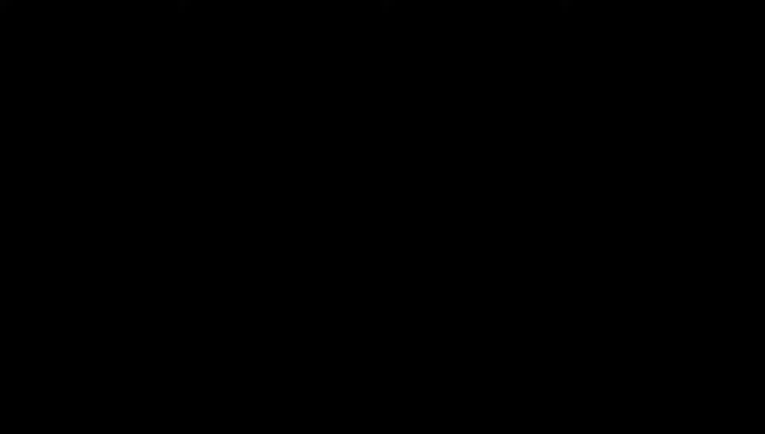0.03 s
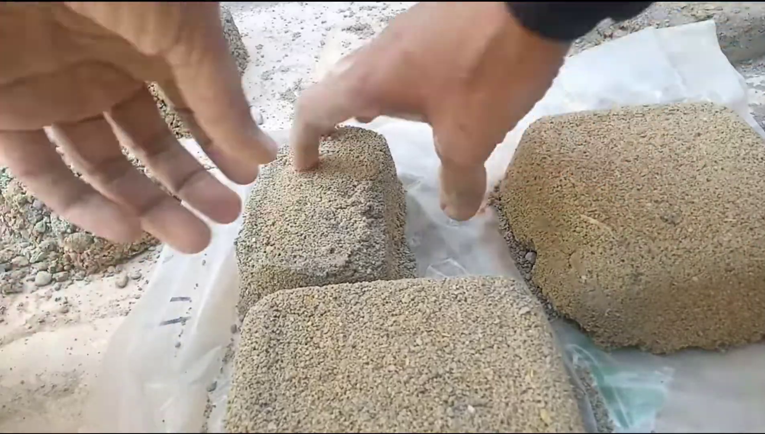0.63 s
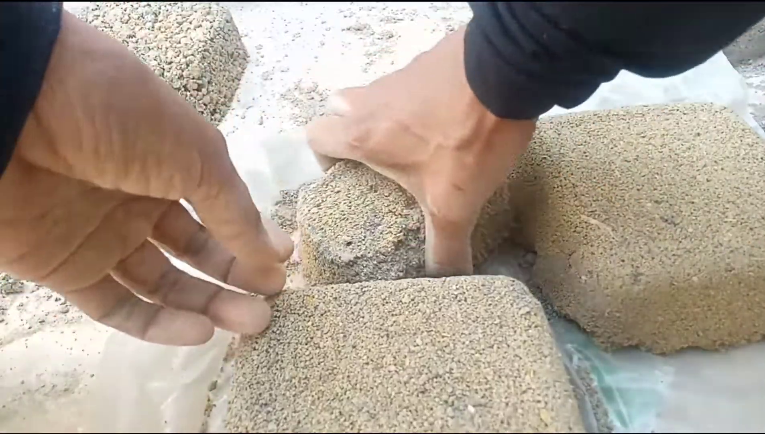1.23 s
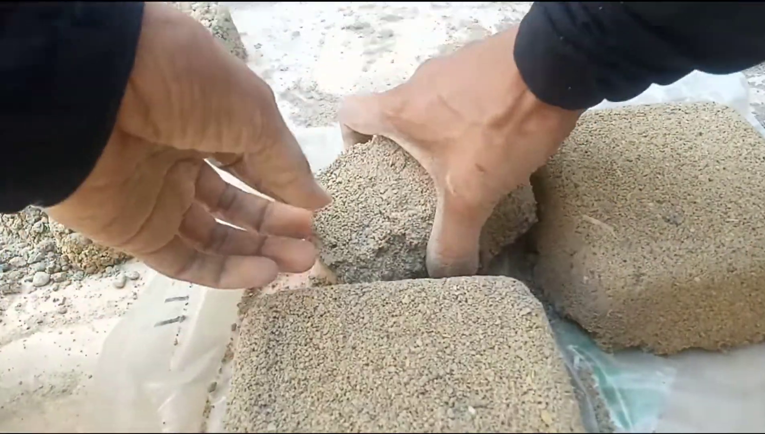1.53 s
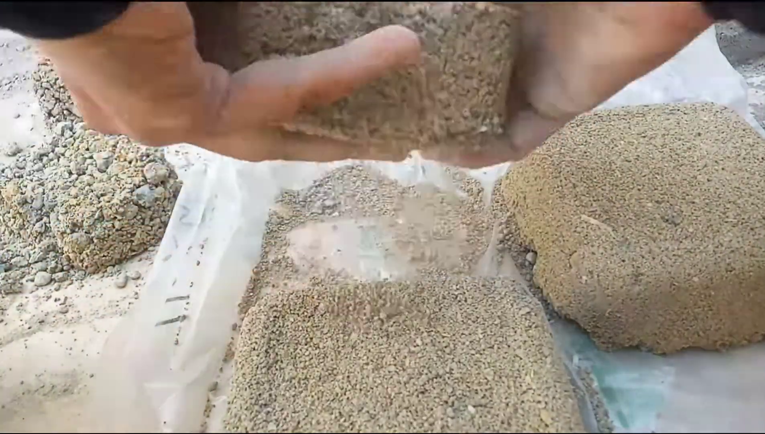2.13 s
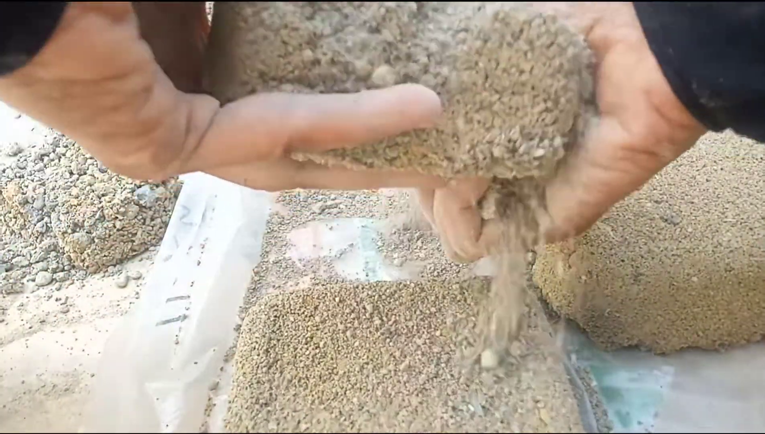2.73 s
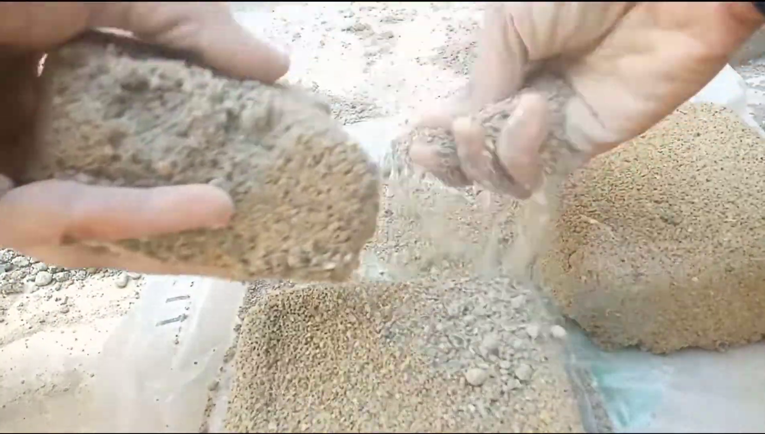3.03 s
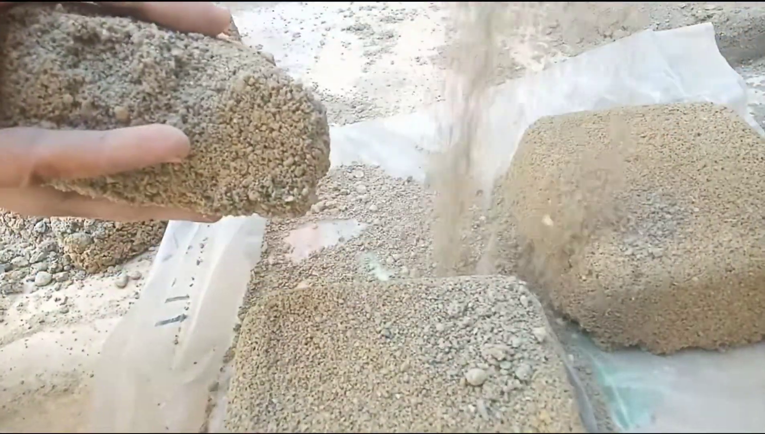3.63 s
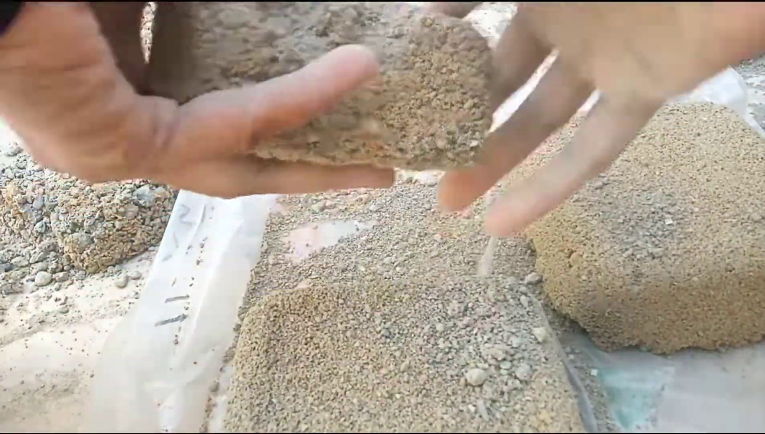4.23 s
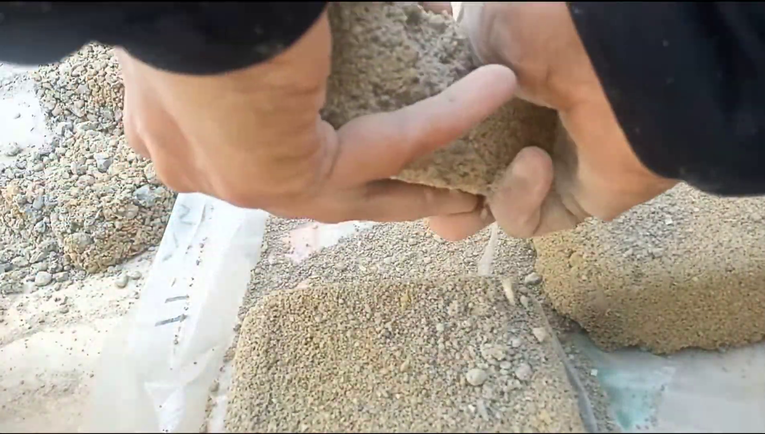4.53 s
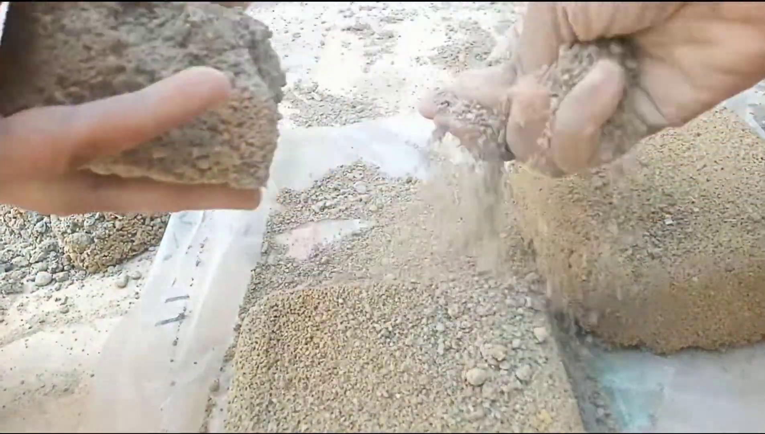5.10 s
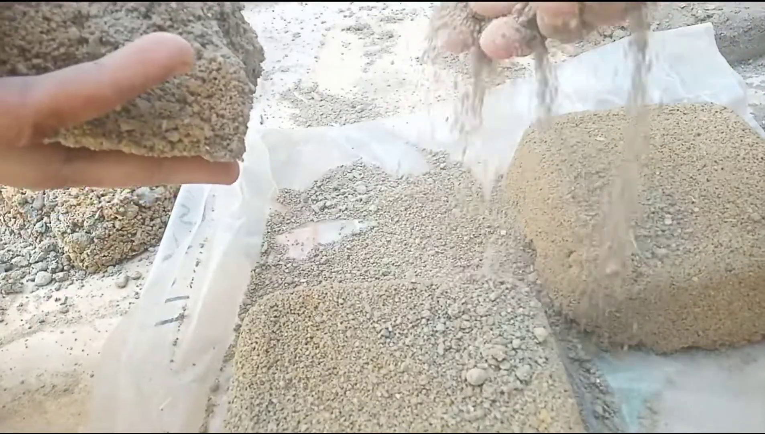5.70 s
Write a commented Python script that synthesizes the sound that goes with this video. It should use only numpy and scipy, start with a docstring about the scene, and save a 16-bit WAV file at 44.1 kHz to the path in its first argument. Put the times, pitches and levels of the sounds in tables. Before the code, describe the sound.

Two hands grip and grind a sandy concrete block close to the microphone, making dry, gritty crunches with sharp clicks of snapping crumbs. Loose grit then rains onto other blocks and a plastic sheet. A second round of crunching, with soft dull thuds, leads to another hissing pour. Behind it are a low machine hum, outdoor rumble and faint birds.

```python
"""Sandy concrete, broken and ground to grit by two hands close by.
Thousands of grains snap loose and rain onto other blocks and a plastic sheet, each a tick, a brief
ring and a spray of splinters. Larger crumbs click, tiny chips tick, the gripped block thuds.
Behind: low machine hum, outdoor rumble, faint birds."""
import sys
import numpy as np
from scipy import signal
from scipy.fft import rfft, irfft
from scipy.io import wavfile
from scipy.ndimage import uniform_filter1d

SR = 44100
rng = np.random.default_rng(int(sys.argv[2]) if len(sys.argv) > 2 else 0)


def unload_audio(sound):
    """Save the sound as a 16-bit wav file, at the path given as the first command line argument."""
    columns = np.transpose(np.atleast_2d(sound))
    # keep every value between -1 and 1, then stretch to whole-number steps
    steps = np.round(np.clip(columns, -1, 1) * 32767)
    wavfile.write(sys.argv[1], SR, steps.astype(np.int16))


N = 262836
START_S = 0.14


def undb(db):
    """Decibels to gain."""
    return 10 ** (np.asarray(db) / 20)


def unit(x):
    """Scale to rms 1."""
    return x / np.sqrt(np.mean(x ** 2) + 1e-18)


def colour(x, spectrum, size=8192):
    """Minimum-phase filter through (frequency [Hz], gain [dB]) points; 20 dB/octave skirts."""
    hz, db = np.transpose(spectrum)
    f = np.maximum(np.fft.rfftfreq(size, 1 / SR), 1)
    octaves_outside = np.maximum(np.log2(hz[0] / f), 0) + np.maximum(np.log2(f / hz[-1]), 0)
    gain_db = np.interp(np.log(f), np.log(hz), db) - 20 * octaves_outside
    cepstrum = irfft(np.log(undb(gain_db)))
    cepstrum[1:size // 2] *= 2
    cepstrum[size // 2 + 1:] = 0
    response = irfft(np.exp(rfft(cepstrum)))
    return signal.fftconvolve(x, response)[:len(x)]


def ring(x, hz, q):
    """One resonance, gain 1 at its centre."""
    return signal.lfilter(*signal.iirpeak(min(hz, SR / 3), max(q, 1), SR), x)


def walk(rate_hz):
    """Smooth random drift, rms 1."""
    step = max(int(SR / rate_hz), 1)
    held = np.repeat(rng.standard_normal(N // step + 1), step)
    return unit(uniform_filter1d(uniform_filter1d(held, step), step)[:N])


def add(out, at_s, sound):
    """Mix a sound in at a time."""
    i = int(at_s * SR)
    out[i:i + len(sound)] += sound[:N - i]


def background(hum_hz=100.0, hum_db=-39, chirr_db=-51, chirr_rise_db_per_s=1, fade_s=0.2):
    """Wavering machine hum with its octave, outdoor rumble, slowly growing chirr of far birds."""
    # spectra: (frequency [Hz], gain [dB])
    rumble_spectrum = [(22, -54), (38, -18), (52, -8.5), (80, 0.5), (130, -2), (190, -5), (280, -6),
                       (450, -15), (800, -20), (1500, -25), (3500, -29), (5500, -47), (7000, -46.5),
                       (10000, -65.5), (15000, -63)]
    chirr_spectrum = [(2500, -30), (3150, 7), (3450, 9), (3800, 9.5), (4400, 0), (5200, -41)]
    # rumble envelope: (time [s], level [dB])
    rumble_levels = [(0.3, -40), (0.8, -36.5), (1.8, -38), (2.8, -36.5), (4.1, -36), (5.2, -35),
                     (5.95, -37.5)]
    t = np.arange(N) / SR
    phase = 2 * np.pi * np.cumsum(hum_hz + 1.515 * walk(9)) / SR
    hum = unit(np.sin(phase) + undb(-15.5) * np.sin(2 * phase)) * undb(hum_db + 2.14 * walk(12))
    rumble = unit(colour(rng.standard_normal(N), rumble_spectrum))
    rumble *= undb(np.interp(t, *np.transpose(rumble_levels)) + 1.44 * walk(25))
    chirr = unit(colour(rng.standard_normal(N), chirr_spectrum))
    chirr *= undb(chirr_db + chirr_rise_db_per_s * t + 0.92 * walk(68))
    fade_in = np.clip((t - START_S) / fade_s, 0, 1)
    return (hum + rumble + chirr) * undb(-13 * (1 - fade_in))


def bird(start_hz=3750, floor_hz=3270, glide_s=0.022, length_s=0.07):
    """Short far whistles that drop in pitch and flutter in the air."""
    # chirps: (time [s], level [dB])
    calls = [(0.165, -58), (0.275, -54), (0.464, -48), (0.672, -53)]
    out, t = np.zeros(N), np.arange(int(length_s * SR)) / SR
    hz = floor_hz + (start_hz - floor_hz) * np.exp(-t / glide_s)
    chirp = np.sqrt(2) * np.sin(2 * np.pi * np.cumsum(hz) / SR) * np.sin(np.pi * t / length_s)
    for at_s, db in calls:
        add(out, at_s, chirp * undb(db))
    return out * undb(2.5 * walk(300))


def thuds(rise_s=0.0061, rub_hz=145, rub_decay_s=0.022):
    """The block gives way between the palms: two or three low swings and a dull rub of skin."""
    # jolts of the block: (time [s], level [dB], pitch [Hz])
    jolts = [(1.985, -24, 93), (3.478, -20, 112), (3.938, -17, 104), (4.008, -16.5, 109),
             (4.23, -20.5, 122), (4.281, -16.5, 103), (4.403, -14.5, 94.5), (4.485, -16, 96),
             (4.547, -22.5, 100), (4.643, -22, 100), (4.742, -16, 104), (4.817, -21, 86),
             (4.941, -17.5, 92), (5.058, -12, 100), (5.295, -20, 94), (5.403, -18.5, 126)]
    out, t = np.zeros(N), np.arange(SR // 8) / SR
    swell = (t / rise_s) ** 2 * np.exp(2 - 2 * t / rise_s)
    slip = (1 - np.exp(-t / rise_s)) * np.exp(-t / rub_decay_s)
    for at_s, db, hz in jolts:
        rub = unit(ring(ring(rng.standard_normal(len(t)), rub_hz, q=1.7), rub_hz, q=1.7))
        swing = swell * np.sin(2 * np.pi * hz * t)
        add(out, at_s, undb(db) * (undb(-10) * slip * rub - swing))
    return out


def chips(hz=9500, decay_s=0.00073):
    """Hard chips, so small that they only tick, very high."""
    # chips flicking close by: (time [s], peak [dB])
    flicks = [(0.913, -48), (0.925, -49), (1.0659, -42), (1.3853, -39), (2.949, -47), (4.592, -50),
              (5.4234, -39)]
    out, t = np.zeros(N), np.arange(SR // 100) / SR
    for at_s, db in flicks:
        tick = ring(rng.standard_normal(len(t)) * np.exp(-t / decay_s), hz, q=1.1)
        add(out, at_s, tick * undb(db) / np.abs(tick).max())
    return out


def crumbs(spray_db=-18, spray_t60_s=0.013, ring_db=8, trim_db=-1.0):
    """A large crumb gives one sharp click, a short ring and a spray of splinters."""
    # crumbs snapping off or landing: (time [s], level [dB], ring [Hz])
    snaps = [(0.79, -22, 2100), (0.913, -15, 2320), (0.922, -20, 2620), (1.2, -14, 2390),
             (1.293, -14, 1820), (1.341, -15.5, 2210), (1.899, -20, 2580), (2.073, -18.5, 2310),
             (2.104, -15, 2710), (2.306, -12, 2340), (2.36, -13, 2870), (2.441, -16, 2640),
             (2.516, -12.5, 2870), (2.601, -17, 2420), (2.959, -11.5, 2680), (4.006, -12, 2200),
             (4.233, -18, 1803), (4.253, -9.5, 2320), (4.438, -18.5, 2660), (4.504, -18, 1800),
             (4.515, -23, 2290), (4.558, -22.5, 1800), (4.655, -20, 2300), (4.668, -20, 2260),
             (4.7, -14.5, 2650), (4.77, -14, 3200), (4.802, -16, 2330), (4.935, -9.5, 2280),
             (5.775, -15, 2610), (5.801, -13, 2850), (5.851, -15, 2510), (5.86, -18.5, 2710)]
    # click spectrum: (frequency [Hz], gain [dB])
    spectrum = [(200, -23), (600, -1), (850, -5.5), (1100, 5), (2500, 0), (3600, -0.5), (4500, -11),
                (5500, -29.5), (7000, -16.5), (9500, -47), (15000, -35)]
    out, t = np.zeros(N), np.arange(SR // 25) / SR
    for at_s, db, hz in snaps:
        spray = undb(spray_db - 60 * t / spray_t60_s) * rng.standard_normal(len(t))
        force = (t == 0) + spray
        click = colour(force + undb(ring_db) * ring(force, hz, q=5), spectrum)
        add(out, at_s, click * undb(db + trim_db) / np.abs(click).max())
    return out


def strokes(table, attack_s, release_s):
    """Each hand stroke sets in, swells or sags, and dies away; one row of gain per stroke."""
    t, gains = np.arange(N) / SR, []
    for at_s, length_s, db, swell_db, *_ in table:
        held = undb(db + swell_db * np.clip((t - at_s) / length_s, 0, 1))
        attack = np.clip((t - at_s) / attack_s, 0, 1)
        release = np.exp(-np.maximum(t - at_s - length_s, 0) / release_s)
        gains.append(held * attack * release)
    return np.array(gains)


def grit_flow():
    """Summed level of all strokes and their power-weighted ring, knock and dust, all in dB."""
    # hands grip, drag and grind the block:
    # (time [s], length [s], level [dB], swell [dB], bright ring [dB], hollow knock [dB], dust hiss [dB])
    grinds = [(0.778, 0.32, -32.5, -6.5, 0, -23, -22.5), (1.049, 0.2, -32.5, 4.5, 4, -26, -23),
              (1.26, 0.037, -29, 1, -1, -13, -23), (1.329, 0.085, -32.5, -1, -1.5, -16, -23.5),
              (1.428, 0.72, -40.5, -2, -1.5, -16, -24.5), (2.105, 0.074, -26, 1.5, 2, -11, -22.5),
              (2.186, 0.19, -27, -3.5, 4, -20, -25), (2.398, 0.37, -31.5, -1, 2, -17, -25),
              (2.803, 0.22, -31.5, -1, 0.5, -18.5, -22.5), (4.228, 0.064, -32, 0.5, -4, -13, -24),
              (4.317, 0.024, -25.5, 2, -1, -16, -31.5), (4.407, 0.21, -44, 0.5, 0.5, -23, -28),
              (4.65, 0.19, -36, -2.5, -1.5, -28, -23), (4.841, 0.21, -32.5, 3.5, -3, -14.5, -23.5)]
    # the fist opens and grit rains down: same columns
    pours = [(3.009, 0.14, -26, -0.3, 1.5, -17.5, -24), (3.149, 0.092, -23.5, 0.72, -0.5, -19.5, -23.5),
             (3.301, 0.14, -29, -1, -1, -16.5, -25), (3.449, 0.17, -23, -0.39, 1.5, -16, -25),
             (3.653, 0.24, -22, 0.78, 3.5, -17, -27), (3.93, 0.086, -20, -0.48, 4.5, -12.5, -26),
             (4.05, 0.073, -24, -2, 0.5, -25, -28.5), (5.04, 0.071, -24.5, -0.9, -3, -13.5, -24),
             (5.171, 0.2, -26, 1, 0, -15.5, -23.5), (5.429, 0.7, -27.5, -1.7, -1.5, -13, -25)]
    grinding = strokes(grinds, attack_s=0.01, release_s=0.039)
    pouring = strokes(pours, attack_s=0.031, release_s=0.085)
    power = np.vstack([grinding, pouring]) ** 2 + 1e-14
    total = power.sum(axis=0)
    timbre_db = np.array(grinds + pours)[:, 4:]
    ring_db, knock_db, dust_db = timbre_db.T @ power / total
    return 10 * np.log10(total), ring_db, knock_db, dust_db


def impacts(rate_per_s, spread_db, cap_db):
    """Random grain contacts, mostly tiny, a few large; mean power independent of rate."""
    size = undb(np.minimum(spread_db * rng.exponential(size=N), cap_db))
    hits = rng.random(N) < rate_per_s / SR
    return unit(hits * size * rng.choice([-1, 1], N) / np.sqrt(rate_per_s))


def skitter(contacts, t60_s, spray_db):
    """Contacts, each followed by a fading spray of bouncing splinters."""
    pole = undb(-120 / (t60_s * SR))
    power = signal.lfilter([1 - pole], [1, -pole], contacts ** 2)
    return contacts + undb(spray_db) * np.sqrt(power) * rng.standard_normal(N)


def grain_rings(contacts, q, pitch_count=24):
    """Each contact rings briefly at the pitch of its own grain."""
    kind = rng.integers(0, pitch_count, N)
    clicks = contacts * rng.choice([-1, 1], N)
    pitches_hz = np.geomspace(900, 5500, pitch_count)
    return unit(sum(ring(clicks * (kind == k), hz, q) for k, hz in enumerate(pitches_hz)))


def grit(ref_grains_per_s=3600, ref_flow_db=-29, rate_exponent=0.85):
    """Grains break loose in small avalanches; the same contacts tick, hiss and knock on the blocks."""
    # spectra of grain ticks, block knock and fine sand: (frequency [Hz], gain [dB])
    grain_spectrum = [(700, -22), (860, -17), (960, -5), (1430, -1.5), (1570, -7), (1780, -0.5), (1980, -6),
                      (2300, -1.5), (2750, -0.5), (3020, -4.5), (3200, -2.5), (3580, -2), (3900, -11.5),
                      (4400, -12.5), (5000, -23), (5600, -33)]
    knock_spectrum = [(200, -13.5), (350, -16), (470, -8.5), (620, -4), (730, -8), (820, -18.5),
                      (1100, -23.5)]
    sand_spectrum = [(4500, -40), (5600, -1.5), (6700, 1.5), (7400, -0.5), (8500, -11.5), (10000, -17.5),
                     (12300, -18.5), (13600, -14.5), (15500, -18)]
    flow_db, ring_db, knock_db, dust_db = grit_flow()
    rate_per_s = np.maximum(ref_grains_per_s * undb(rate_exponent * (flow_db - ref_flow_db)), 900)
    # a thin trickle spurts, a thick pour runs evenly
    spurt_db = np.minimum(np.sqrt(2500 / rate_per_s), 2)
    avalanche = undb(spurt_db * walk(90) + 0.71 * walk(25))
    contacts = impacts(rate_per_s, spread_db=2.0, cap_db=12.5) * avalanche
    clicks = skitter(contacts, t60_s=0.043, spray_db=-8.5)
    grains = unit(colour(clicks + undb(-4.5) * grain_rings(contacts, q=8.6), grain_spectrum))
    # each stroke's ring setting lends the grains a brighter ring around 2.85 kHz
    grains += (undb(ring_db) - 1) * ring(grains, hz=2850, q=3.1)
    grains = unit(grains * undb(-0.6 * ring_db))
    knock = unit(colour(clicks, knock_spectrum)) * undb(knock_db)
    fine_clicks = skitter(contacts, t60_s=0.011, spray_db=2.0)
    sand = unit(colour(fine_clicks, sand_spectrum)) * undb(dust_db)
    return (grains + knock + sand) * undb(flow_db + 0.13)


def scene():
    """Crumbling in front, yard behind; mono."""
    return (grit() + crumbs() + chips() + thuds() + bird() + background())[None]


def record(dry, cutoff_hz=15650, ramp_s=0.005):
    """Silence until START_S, a short ramp in, then a steep low-pass."""
    opening = np.clip((np.arange(N) / SR - START_S) / ramp_s, 0, 1)
    lowpass = signal.ellip(10, 0.2, 80, cutoff_hz, fs=SR, output="sos")
    return signal.sosfilt(lowpass, dry * opening)


dry = scene()
out = record(dry)
unload_audio(out)
```